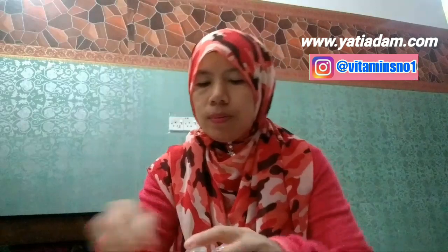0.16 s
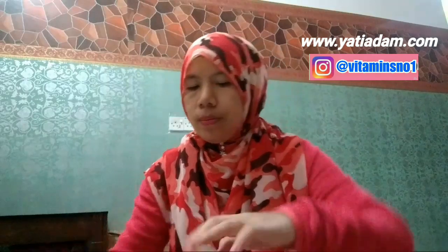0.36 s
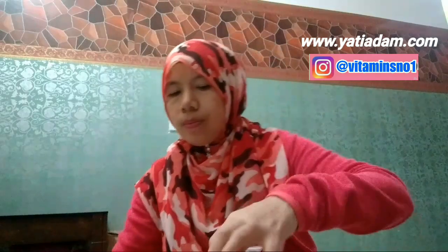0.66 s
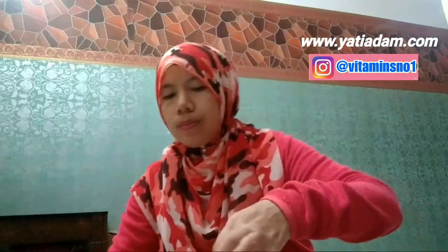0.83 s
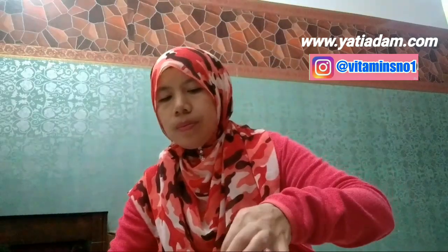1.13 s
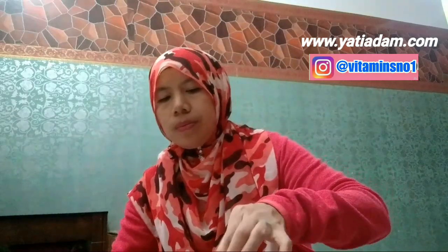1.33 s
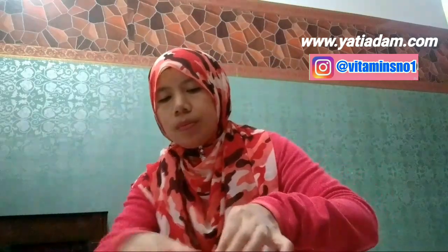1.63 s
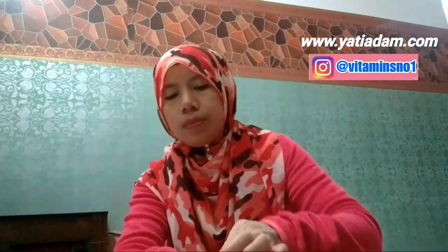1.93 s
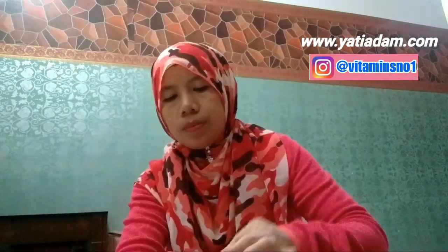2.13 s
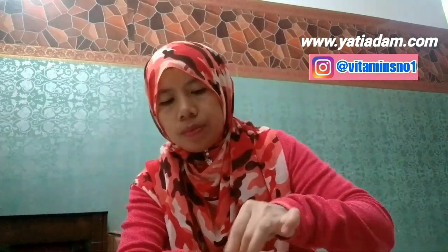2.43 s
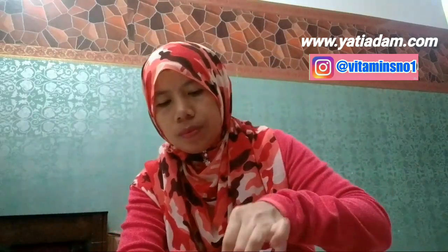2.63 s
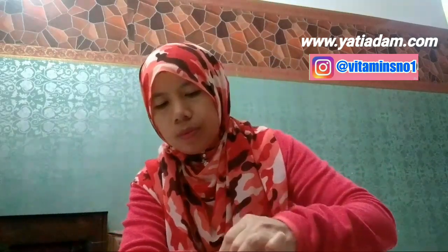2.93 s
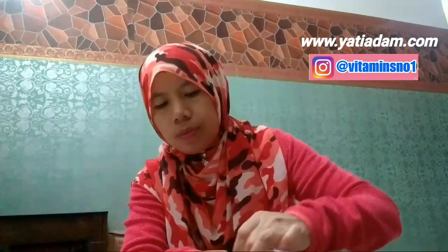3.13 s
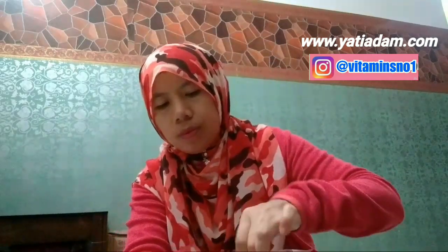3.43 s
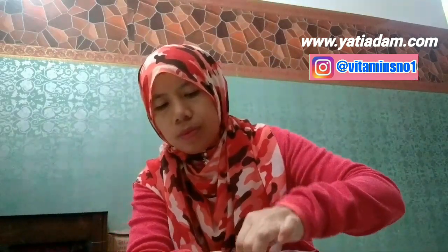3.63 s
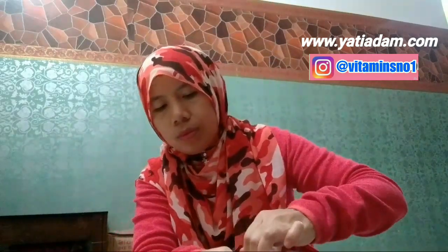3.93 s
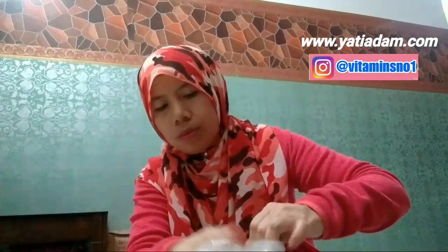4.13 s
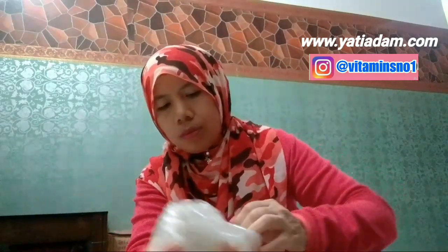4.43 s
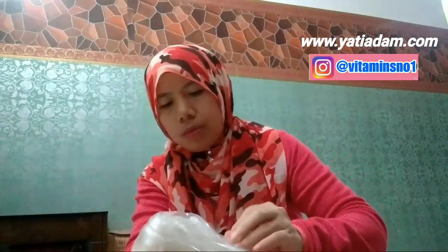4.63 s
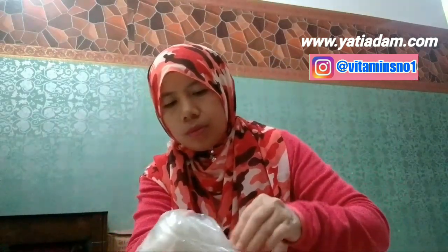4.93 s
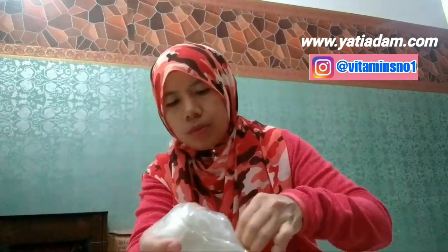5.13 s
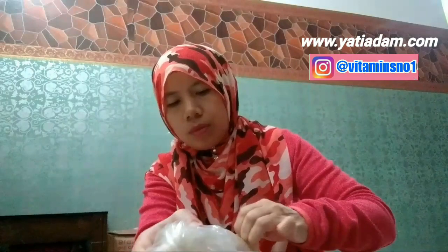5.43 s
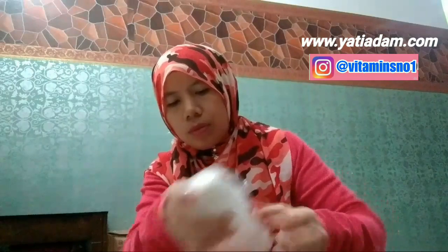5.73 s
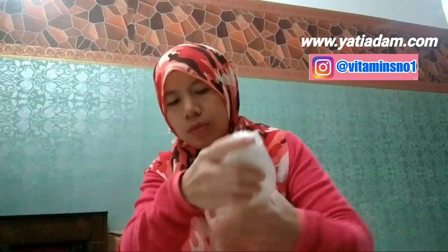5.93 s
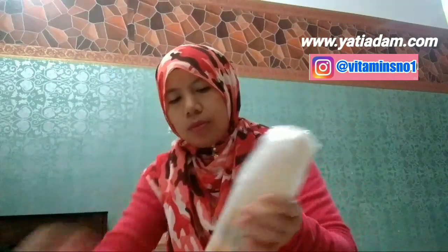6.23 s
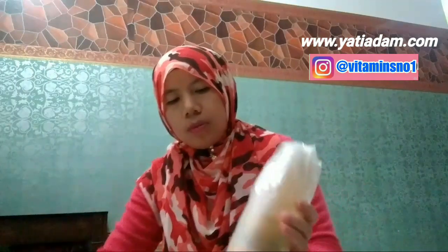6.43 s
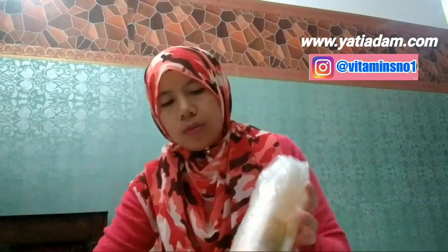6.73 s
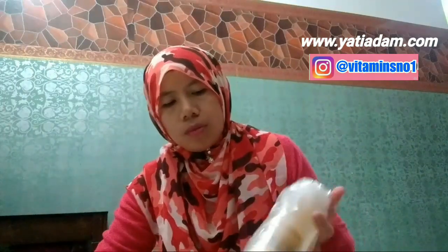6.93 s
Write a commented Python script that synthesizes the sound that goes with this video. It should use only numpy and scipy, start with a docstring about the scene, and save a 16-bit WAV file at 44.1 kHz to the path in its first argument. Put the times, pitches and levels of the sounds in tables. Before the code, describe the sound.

Plastic film crackles and snaps irregularly as hands pick and pull it off a parcel, with a few dull desk thumps in a hard room.

```python
"""Plastic wrapping pulled off a parcel

Hands pick and pull the film on a desk in a hard-walled room. Creases buckle in single sharp snaps
(filtered clicks) over a fine crackle (clumped random clicks) that follows the hands' work.
Fingers nudge the parcel and twice something thumps on the desk (dull pushes into resonant modes).
Noise-built reflections ring after it all, over faint steady air noise."""
import sys
import numpy as np
from scipy import signal
from scipy.fft import rfft, irfft
from scipy.io import wavfile
from scipy.ndimage import uniform_filter1d

SR = 44100
rng = np.random.default_rng(int(sys.argv[2]) if len(sys.argv) > 2 else 0)


def to_wav(sig):
    """Store sig (one row per channel, or 1-D mono) as 16-bit WAV at the path in sys.argv[1].

    Samples outside -1..1 are clipped; the rate is SR.
    """
    pcm = np.clip(np.atleast_2d(sig), -1, 1) * 32767
    pcm = np.round(pcm).astype(np.int16)
    wavfile.write(sys.argv[1], SR, pcm.T)  # frames by channels


N = 311787

# loudest buckling creases: t/s, level/dB over 1 ms, centre f/Hz, sharp ones also sizzle/dB re snap
CREASE_SNAPS = [(0.1829, -41, 2510), (0.2724, -34, 2250), (0.382, -45, 2500), (0.4645, -44, 2400),
                (0.4823, -39.5, 2040), (0.5526, -44, 1620), (0.692, -47, 2400), (0.723, -38, 2000),
                (0.7316, -41, 2270), (0.7483, -44, 1650), (0.9066, -35, 1710, -7.5), (0.942, -31, 1640, -6),
                (1.0431, -25.5, 1500, -8), (1.3495, -35, 1700), (1.353, -32, 2000, -11),
                (1.3884, -37, 2500, -5), (1.8332, -43.5, 1670), (1.8955, -26.5, 1410, -16),
                (1.9132, -38, 2000), (1.9287, -27, 2130, -13), (1.98, -27.5, 1870, -5),
                (2.0071, -33, 1440, -15), (2.016, -27.5, 2700, -7.5), (2.106, -40, 2500),
                (2.1224, -38.5, 1800), (2.295, -52, 1400), (2.4429, -31, 1460, -22.5),
                (2.4696, -36.5, 1640), (2.851, -54, 2800, -7), (2.9284, -28, 1950, 0.5),
                (2.9593, -31, 1600, -7), (2.9698, -23, 1550, -10.5), (3.0674, -16.5, 2500, -12),
                (3.088, -35, 3400), (3.314, -35, 1870, -10), (3.4293, -37.5, 1700, -13), (3.451, -42, 1200),
                (3.4826, -33.5, 2180, -20), (3.5074, -40, 2180, -15), (3.5264, -29, 2250, -18),
                (3.5834, -42.5, 1520), (3.739, -37.5, 2200), (3.7677, -38, 1970, -12), (3.8013, -34, 1750),
                (3.8094, -32.5, 1420), (3.832, -29.5, 1650, 0), (3.8458, -28.5, 1780, -3),
                (3.863, -33, 1900, 0), (3.948, -38, 1210), (3.9798, -33, 2310, -2), (4.162, -41, 1300),
                (4.241, -28, 2800, -9), (4.2953, -37.5, 1960, -8), (4.3456, -27.5, 2700, -16),
                (4.5389, -34, 2500), (4.5803, -34, 2330, -11.5), (4.6397, -32.5, 1400),
                (4.6575, -20, 1460, -13.5), (4.679, -32, 2300), (4.7343, -36, 2040), (4.77, -37.5, 1680),
                (4.8096, -29.5, 1560, -21.5), (4.8291, -34.5, 1530), (5.0007, -42, 1900),
                (5.162, -35, 2470, -7.5), (5.2496, -35.5, 1260), (5.2976, -24, 2100),
                (5.3095, -27.5, 2800, -13), (5.3278, -32, 2300), (5.335, -35, 2100),
                (5.4229, -29, 1880, -16.5), (5.4412, -15, 2220, -14), (5.482, -31, 1000),
                (5.647, -28.5, 1600, -17), (5.6928, -39, 1230), (5.7368, -37.5, 1890),
                (5.7562, -34.5, 2020, -4), (5.7682, -32, 2610, -8), (5.7812, -34.5, 2500, -3),
                (5.79, -34, 2290), (5.811, -34, 1200), (5.8715, -36, 2480), (6.002, -36, 2080),
                (6.0928, -37, 1050), (6.1044, -36.5, 1460), (6.1614, -32, 2370, -12.5),
                (6.2069, -30.5, 1840, -13), (6.2382, -38.5, 1760), (6.3929, -41, 2650),
                (6.4416, -42.5, 1870), (6.5784, -31.5, 1650, -9), (6.848, -44, 1000), (7.006, -43, 1630)]
# buckling facet spectrum: f/centre f, level/dB
FACET_SPECTRUM = [(.03, -57.5), (.1, -17), (.3, -4.5), (.65, 2.5), (1.2, 3), (2, -3.5), (2.8, -7.5),
                  (10, -58)]
# sharp crease edge spectrum: f/Hz before the click's frequency scale, level/dB
EDGE_SPECTRUM = [(2000, -11.5), (4000, 4), (5600, -2.5), (7000, -1), (9500, -9.5), (12500, -16),
                 (15100, -18), (16200, -15)]
# diffuse field of the room: f/Hz, left-right correlation
ROOM_CORRELATION = [(100, 0.87), (300, 0.9), (600, 0.7), (1100, 0.0), (2000, -0.38), (4000, -0.021),
                    (15000, 0.17)]

DULL_DB = -25  # sizzle of a blunt crease or soft flex
HARD_DB = -19  # a snap above this sets the whole sheet ringing


def gain_of(db):
    """Decibels to amplitude."""
    return 10 ** (np.asarray(db) / 20)


def evened(x):
    """Scales to rms 1."""
    return x / np.sqrt(np.mean(x ** 2) + 1e-20)


def unit(x):
    """Scales to energy 1."""
    return x / np.sqrt(np.sum(x ** 2) + 1e-20)


def read(points, hz):
    """Interpolates a table along a logarithmic axis."""
    f, value = np.transpose(points)
    return np.interp(np.log(hz + 1e-6), np.log(f), value)


def add(mix, s, sound):
    """Adds a sound into the mix at time s."""
    part = mix[max(round(s * SR), 0):][:len(sound)]
    part += sound[:len(part)]


def correlated(z, hz):
    """Gives a pair of noise spectra the room's left-right correlation."""
    same = np.clip(read(ROOM_CORRELATION, hz), -1, 1)
    same = same.reshape((-1,) + (1,) * (z.ndim - 2))
    z[1] = same * z[0] + np.sqrt(1 - same ** 2) * z[1]
    return z


def click(spectrum, scale_hz, flutter, flutter_s, focus=1, size=1024):
    """Minimum-phase click of energy 1 with decaying noise flutter; focus multiplies its dB curve."""
    hz = abs(np.fft.fftfreq(size, 1 / SR))
    log_gain = np.log(gain_of(focus * read(spectrum, hz / scale_hz)))
    pulse = np.fft.ifft(np.exp(np.conj(signal.hilbert(log_gain)))).real
    decay = np.exp(-np.arange(size) / SR / flutter_s)
    shake = flutter * unit(rng.standard_normal(size) * decay)
    shake[0] += 1
    return rng.choice([-1, 1]) * unit(signal.fftconvolve(pulse, shake)[:size])


def air(level_db=-72.5):
    """Still air: faint steady rumble and hiss as shaped noise, alike on both sides in the bass."""
    # still air: f/Hz, density/dB per Hz before rms scaling
    air_spectrum = [(25, 5), (180, 0.5), (400, -10.5), (3000, -26), (5000, -26), (16000, -34)]
    hz = np.fft.rfftfreq(N, 1 / SR)
    z = correlated(rfft(rng.standard_normal((2, N))), hz)
    return gain_of(level_db) * evened(irfft(z * gain_of(read(air_spectrum, hz)), N))


def room(x, build_s=0.013, wall_s=0.015, wall=0.07):
    """Reflections thicken, the near wall answers, and each band dies at its own speed."""
    # reverberation time: f/Hz, T60/s
    t60_table = [(100, 0.33), (2000, 0.5), (7000, 0.29), (15000, 0.33)]
    # reverberation colour: f/Hz, level/dB
    colour_table = [(100, 6), (650, 0.5), (1600, -2.5), (3700, 1.5), (4700, -2), (15000, -0.5)]
    shape = (2, SR * 3 // 4)
    taps = rng.standard_normal(shape) * (rng.random(shape) < .12)  # sparse reflections
    hz, t, z = signal.stft(taps, SR, nperseg=256)
    z = correlated(z, hz)
    decay = gain_of(-60 * t / read(t60_table, hz)[:, None])
    tail = signal.istft(z * decay, SR, nperseg=256)[1]
    tail *= np.minimum(np.arange(tail.shape[1]) / SR / build_s, 1)
    tail = np.sqrt(2) * unit(tail)
    tail[:, round(wall_s * SR)] += wall
    colour = gain_of(read(colour_table, np.fft.rfftfreq(tail.shape[1], 1 / SR)))
    tail = irfft(rfft(tail) * colour)
    return signal.fftconvolve(x[None], tail, axes=1)[:, :N]


def moving_room(x, count=3, turns_per_s=1.3):
    """As the parcel turns, its sound is shared out in rotation among different paths round the room."""
    turn = np.arange(N) / SR * turns_per_s
    shares = np.array([np.maximum(np.cos(2 * np.pi * (turn - k / count)), 0) for k in range(count)])
    shares = shares / np.linalg.norm(shares, axis=0)  # constant power
    return sum(room(x * share) for share in shares)


def direct(x, left_db, size=3):
    """Straight path: left is raised and right cut by left_db; right lags by size samples."""
    late = np.pad(x, (size, 0))[:len(x)]
    return np.array([gain_of(left_db) * x, gain_of(-left_db) * late])


def desk(focus=2.3, even_s=0.015, push_db=-18, low_hz=75, size=16384):
    """A dull push, a shuffle as the load settles (equal to the push at even_s), and the top's modes."""
    # hands and parcel on the desk: t/s, level/dB over 20 ms, centre f/Hz, settling time/s
    bumps = [(.004, -39, 900, 0.026), (.009, -30, 310, .002), (.039, -36, 165, 0.02),
             (.06, -36.5, 180, 0.02), (2.486, -60, 210, .01), (2.968, -53, 330, .005),
             (4.044, -52, 600, .02), (4.216, -52, 160, .03), (4.25, -52.5, 160, 0.03),
             (6.527, -33.5, 290, 0.009), (6.539, -31.5, 122, 0.002), (6.583, -39, 230, .003),
             (6.787, -51, 350, 0.02)]
    # desk-top modes: f/Hz, resonance level/dB re push before bump scaling, T60/s
    modes = [(131, -0.5, 0.06), (176, -3, .2), (303, -0.5, 0.09), (545, -10.5, .07)]
    jolt_db, jolt_hz, jolt_s = -36.5, 230, 0.01  # hardest snaps jolt the parcel: level re snap
    jolts = [(s, db + jolt_db, jolt_hz, jolt_s) for s, db, *_ in CREASE_SNAPS if db > -23]
    # too small to radiate below low_hz
    highpass = signal.butter(2, low_hz, "highpass", fs=SR)
    out = np.zeros(N)
    for s, db, hz, settle_s in list(bumps) + jolts:
        push = click(FACET_SPECTRUM, hz, np.sqrt(settle_s / even_s), settle_s, focus, size=size)
        ring = 0
        for mode_hz, mode_db, t60_s in modes:
            q = mode_hz * t60_s * np.pi / np.log(1000)
            resonator = signal.iirpeak(mode_hz, q, fs=SR)
            ring = ring + gain_of(mode_db) * signal.lfilter(*resonator, push)
        bump = signal.lfilter(*highpass, gain_of(push_db) * push + ring)
        add(out, s, gain_of(db) * np.sqrt(SR / 50) * unit(bump))
    return out


def slack(t):
    """How loose the film hangs, 0-1, while the parcel is lifted out and to the left."""
    return np.interp(t, [4.1, 4.6, 6.2, 6.5], [0, 1, 1, 0])


def leftward_db(t):
    """The film favours the left, more so once the parcel is lifted."""
    return 0.12 + 1.23 * slack(t)


def flexing(t, touch_db=-68, touch_sizzle_db=-97, grip_s=0.01, relax_s=0.015, swell_db=2):
    """Crackle and sizzle drive: light touch; each flex starts fast, swells as film tightens, relaxes."""
    # grips and pulls: t/s, length/s, crackle level/dB before the swell, sharp ones also sizzle/dB re crackle
    flexes = [(0.0, 0.014, -39.5, -16), (0.134, 0.069, -53.5), (0.718, 0.033, -58.5), (0.908, 0.098, -68),
              (1.238, 0.025, -51, -9), (1.352, 0.05, -54, -7), (1.831, 0.19, -58), (1.994, 0.16, -57.5, -8),
              (2.455, 0.036, -57), (2.72, 0.19, -76, -3), (2.915, 0.045, -45, -5), (3.314, 0.67, -63),
              (3.617, 0.16, -62.5, -4.5), (3.823, 0.046, -44.5, -6.5), (3.936, 0.08, -56),
              (4.17, 0.06, -53, -14), (4.217, 0.14, -50.5, -17), (4.403, 0.08, -56), (4.521, 0.12, -49),
              (4.608, 0.06, -44.5), (5.019, 0.18, -60, -11), (5.15, 0.012, -46, -7), (5.207, 0.14, -48.5),
              (5.44, 0.05, -45, -6), (5.753, 0.06, -44.5, -16), (5.826, 0.11, -53), (6.006, 0.19, -51.5),
              (6.51, 0.08, -42, -14), (6.755, 0.3, -56.5, -16)]
    # the light touch pauses: start t/s, end t/s
    touch_pauses = [(1.4, 2.02), (2.22, 2.41), (2.5, 2.88)]
    touching = 1. - sum((t > a) & (t < b) for a, b in touch_pauses)
    touch = abs(uniform_filter1d(touching, size=3072))
    effort, bright = gain_of(touch_db) * touch, gain_of(touch_sizzle_db) * touch
    for s, length_s, db, *sharp in flexes:
        sizzle_db = max(sharp, default=DULL_DB)
        swell = gain_of(db + swell_db * np.clip((t - s) / length_s, 0, 1))
        onset = np.clip((t - s) / grip_s, 0, 1)
        flex = swell * onset * np.exp(-np.maximum(t - s - length_s, 0) / relax_s)
        effort = np.maximum(effort, flex)
        bright = np.maximum(bright, gain_of(sizzle_db) * flex)
    return effort, bright


def sparks(per_s, spread_db):
    """Randomly timed impulses: many small, a few large."""
    size = gain_of(spread_db * (np.minimum(rng.exponential(1, N), 3.0) - 2))
    return size * (rng.random(N) < per_s / SR)


def crackle(centre_hz=1900, scatter=0.77, deepening=0.15, deepening_per_db=0.065,
            per_s=800, clump_db=2.8, clump_s=.014, count=24):
    """Tiny creases give way in clumps as hands flex the film; each clump favours one facet size."""
    t = np.arange(N) / SR
    effort, bright = flexing(t)
    pull_db = np.clip(20 * np.log10(effort + 1e-9) + 50, -16, 0)
    # loose film has larger, lower facets; a light touch stirs only small ones
    depth = deepening * slack(t) + deepening_per_db * pull_db
    spread_db = 5.5 + .19 * pull_db  # light touch: even rustle; pull: uneven cracks
    knots = np.arange(0, t[-1], clump_s)
    rows = rng.uniform(-1, 1, (2, SR))
    strength, colour = (np.interp(t, knots, row[:len(knots)]) for row in rows)
    clumps = gain_of(2 * clump_db * strength)
    body, edge = np.zeros((2, N))
    for place in np.linspace(-1, 1, count):
        offset = scatter * place  # log frequency
        train = clumps * sparks(per_s / count, spread_db)
        tick = click(FACET_SPECTRUM, centre_hz * np.exp(offset), flutter=.9, flutter_s=.0018, focus=3.1)
        share = np.exp(-offset * depth - (place - colour) ** 2)
        body += signal.oaconvolve(train * share, tick)[:N]
        edge_tick = click(EDGE_SPECTRUM, 1, flutter=1.5, flutter_s=.002)
        edge += signal.oaconvolve(train, edge_tick)[:N]
    return effort * evened(body) + bright * evened(edge)


def sizzle(s, flutter, flutter_s, taut_hz=14600, taut_db=-17.5):
    """Sharp crease edge at time s; taut film adds a thin fizz at the very top, fading with slack."""
    edge = click(EDGE_SPECTRUM, 0.89, flutter, flutter_s)  # spectrum shifted down to 0.89 f
    top = signal.butter(2, [0.93 * taut_hz, 1.07 * taut_hz], "bandpass", fs=SR)
    fizz = unit(signal.lfilter(*top, edge))
    return edge + gain_of(taut_db) * (1 - slack(s)) * fizz


def sheet(hz, ring_hz=3300, ring_s=0.00024, ring_db=-0.5, flap_db=-6):
    """The whole stretched sheet after a hard snap: a broad, low flap and a short bright ring."""
    flap = click(FACET_SPECTRUM, hz / 2, flutter=.5, flutter_s=.002)
    t = np.arange(len(flap)) / SR
    ring = unit(t * np.exp(-t / ring_s) * np.sin(2 * np.pi * ring_hz * t))
    return gain_of(flap_db) * flap + gain_of(ring_db) * ring


def snaps(narrowing=0.076, slip_db=-22, edge_s=0.0029, edge_flutter=0.98,
          room_base_db=-5.5, room_fall=0.091, room_per_sizzle=0.15):
    """Each crease slips, then flips; fainter ones lie behind the parcel and arrive more by the walls."""
    near, far = np.zeros((2, N)), np.zeros(N)
    one_ms = np.sqrt(SR / 1000)  # energy 1 to rms 1 over 1 ms
    for s, db, hz, *sharp in CREASE_SNAPS:
        sizzle_db = max(sharp, default=DULL_DB)
        # small, taut facets make no bass
        focus = 1 + narrowing * max(HARD_DB - db, 0) * (1 - 0.45 * slack(s))
        body = one_ms * click(FACET_SPECTRUM, hz, flutter=1.0, flutter_s=0.002, focus=focus)
        # sharp creases throw more sound at the walls; slopes in dB per dB
        room_db = room_base_db - room_fall * (db + 30) + room_per_sizzle * (sizzle_db + 15)
        slip_s, lag = rng.uniform(0.0009, 0.0045), rng.integers(2, 5)
        for side, heard in zip(near, direct(body, leftward_db(s), size=lag)):
            # scatters differently to each side
            edge = one_ms * gain_of(sizzle_db) * sizzle(s, edge_flutter, edge_s)
            add(side, s - slip_s, gain_of(db + slip_db) * heard)  # the crease gives a little first
            add(side, s, gain_of(db) * (heard + edge))
        thrown = one_ms * sheet(hz) if db > HARD_DB else body
        add(far, s, gain_of(db + room_db) * (thrown + edge))
    return near, far


def scene():
    """Film, parcel and desk, heard directly and by way of the walls, over the air noise."""
    near, far = snaps()
    fine, knocks = crackle(), desk()
    fine_direct = direct(fine, leftward_db(np.arange(N) / SR))
    film = near + fine_direct + moving_room(far + gain_of(-3) * fine)
    low = direct(knocks, left_db=0.6, size=1) + room(gain_of(-7.0) * knocks)
    return film + low + air()


def record(dry, lag_s=.005, left_db=-3, right_db=2, split_hz=4850, edge_hz=16100):
    """Treble above the split comes late, cut on the left and raised on the right; then a band limit."""
    bass = signal.oaconvolve(dry, signal.firwin(201, split_hz, fs=SR)[None], "same")
    treble = np.pad(dry - bass, ((0, 0), (round(lag_s * SR), 0)))[:, :N]
    out = bass + gain_of([[left_db], [right_db]]) * treble
    lowpass = signal.firwin(511, edge_hz, window=("kaiser", 9), fs=SR)
    return signal.oaconvolve(out, lowpass[None], "same")


dry = scene()
out = record(dry)
to_wav(out)
```